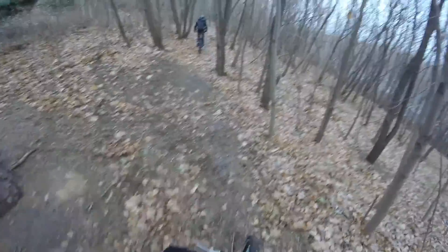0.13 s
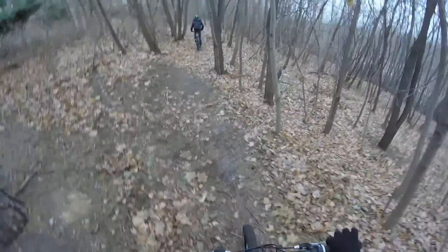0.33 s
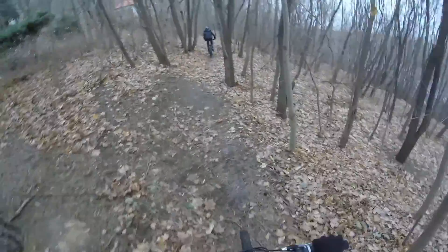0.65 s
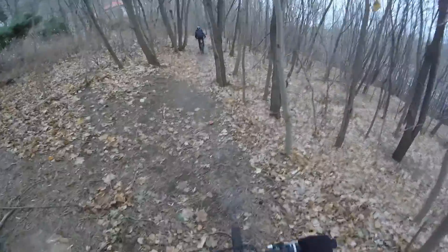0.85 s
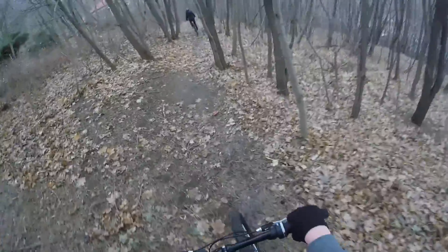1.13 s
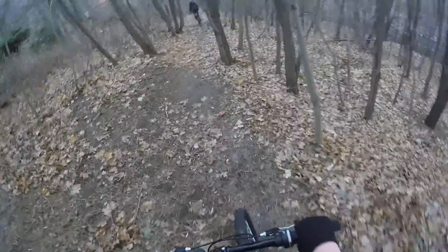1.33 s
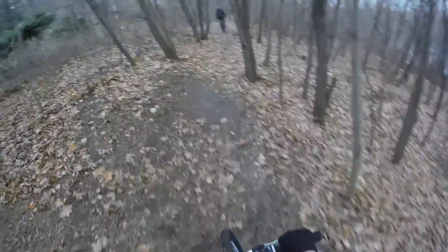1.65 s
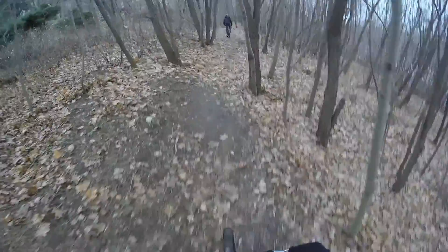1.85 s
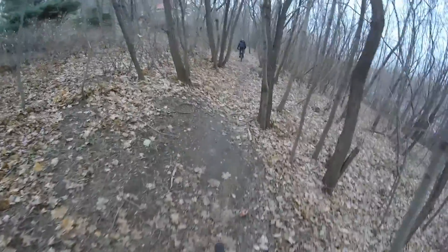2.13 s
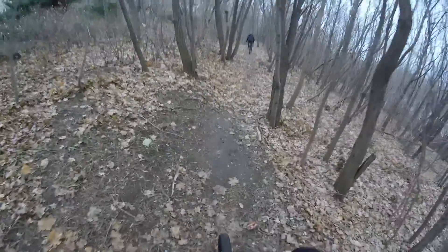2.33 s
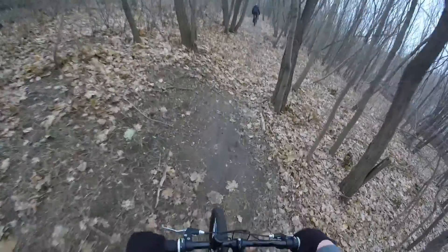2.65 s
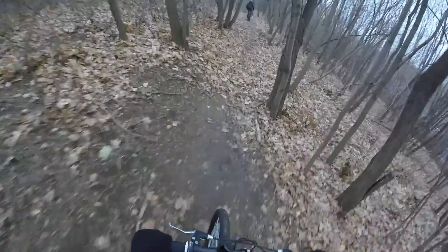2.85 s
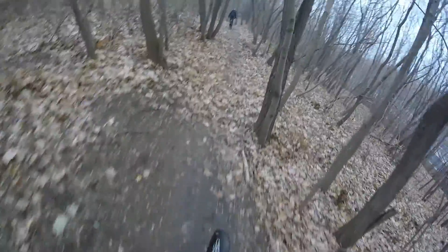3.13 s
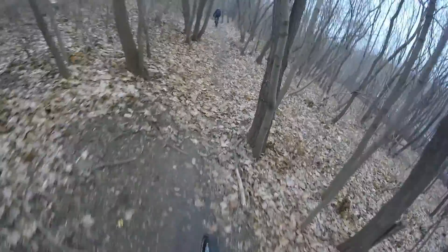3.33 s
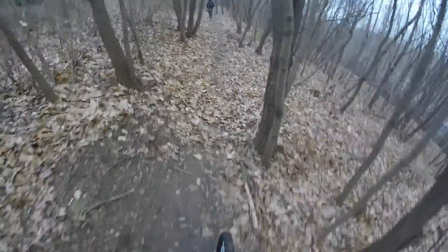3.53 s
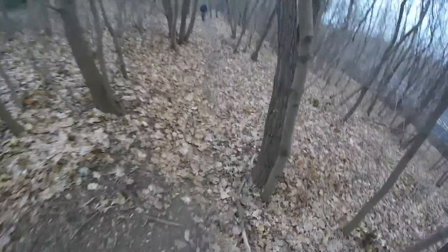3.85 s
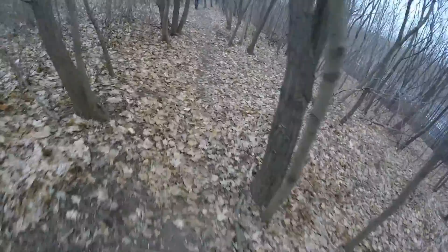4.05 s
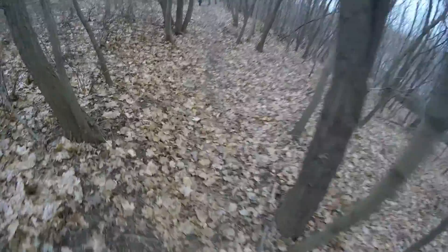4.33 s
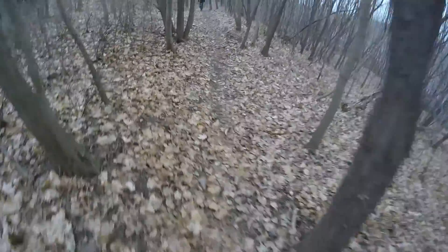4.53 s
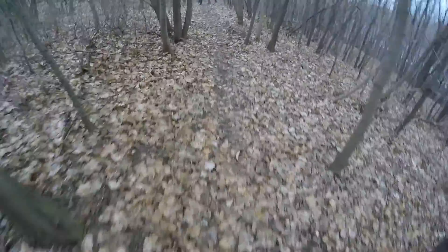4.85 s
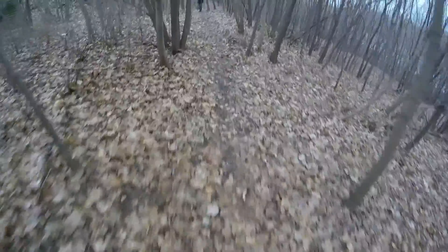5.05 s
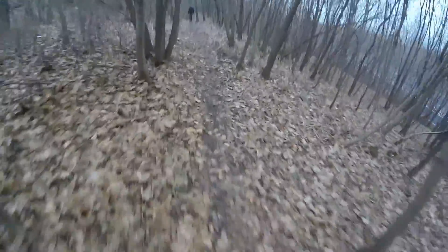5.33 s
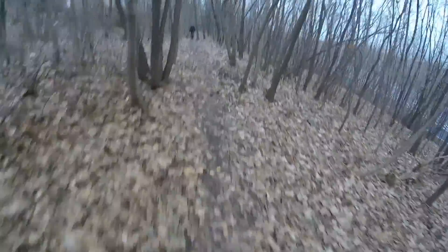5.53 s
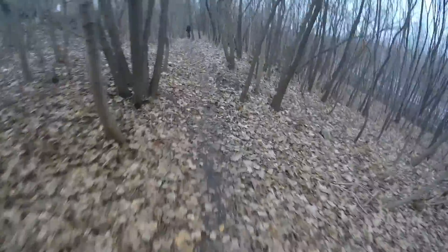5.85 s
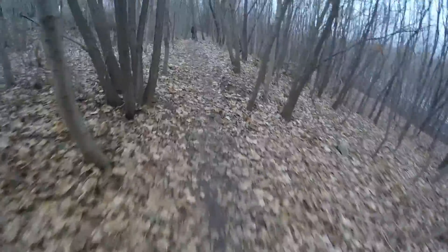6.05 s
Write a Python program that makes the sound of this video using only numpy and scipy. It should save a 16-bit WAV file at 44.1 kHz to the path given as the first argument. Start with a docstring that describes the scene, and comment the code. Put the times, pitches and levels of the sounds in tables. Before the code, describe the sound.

A bike rolls down a leafy forest trail: pulsing gritty crunch, low wind rumble, brief brake squeaks, and hard clacks early and late.

```python
"""Tyres crunch and drum in regular surges as a mountain bike rolls down packed dirt and dry leaves.
Crunch and leaf swish are dense random fractures, coloured by the hollow plastic case around the microphone.
The tread drum and the wind buffeting the case are low shaped noise, over a steady hiss.
A dragging brake squeals in short bursts: stacks of unsteady partials from pad and disc, with a noisy rasp.
Knocks are short chatter ringing through the case; thuds over roots are slow decaying swings."""
import sys
import numpy as np
from scipy import signal
from scipy.fft import rfft, irfft, next_fast_len
from scipy.io import wavfile
from scipy.ndimage import uniform_filter1d

SR = 44100
rng = np.random.default_rng(int(sys.argv[2]) if len(sys.argv) > 2 else 0)


def waveform_to_disk(signal):
    """Save audio, clipped to [-1, 1], as 16-bit WAV at the path in sys.argv[1]."""
    frames = np.transpose(np.atleast_2d(signal))
    scaled = np.clip(frames, -1, 1) * 32767
    samples = np.round(scaled).astype(np.int16)
    wavfile.write(sys.argv[1], SR, samples)


N = 272979
TIME = np.arange(N) / SR  # seconds

# Smooth spectra of the noises, each scaled to its level afterwards: pitch_hz [Hz], relative level_db [dB]
HISS_COLOUR = [(100, 2), (300, 3), (500, 0), (800, -3.5), (1500, -2.5), (3000, -11), (5000, -17),
               (8000, -22), (11000, -26), (15000, -40)]
WIND_COLOUR = [(4, -10), (11, 9.5), (22, -4.5), (40, -7.5), (60, -13), (120, -24.5), (400, -52.5),
               (2000, -88)]
KNOCK_COLOUR = [(200, -7), (700, -8), (1200, -6.5), (2000, -2.5), (3100, -2), (3900, -5.5), (4600, -13),
                (6100, -5.5), (9000, -19.5), (15000, -21)]
DRUM_COLOUR = [(30, -24), (60, -5), (80, 2.5), (105, -0.5), (175, 1), (240, -13), (400, -18), (900, -41),
               (3000, -62.5)]
LEAF_COLOUR = [(300, -41), (900, -2.5), (1600, -14), (2300, 10), (3000, 4.5), (3600, -2.5), (4500, -10.5),
               (6300, -9), (8000, -14.5), (11000, -22.5), (15000, -22)]
CRUNCH_COLOUR = [(200, -27), (600, -12), (950, -12.5), (1200, -4), (1500, 3.5), (2000, -5.5), (2700, -11.5),
                 (3400, -19), (4500, -23.5), (8000, -36.5), (15000, -34)]
# Resonances of the hollow case: pitch_hz [Hz], width_hz [Hz], lift_db [dB]
CASE = [(1164, 41, 9.5), (1636, 290, 12), (1947, 50, 7), (2199, 84, 9.5), (2595, 280, 13.5),
        (2970, 210, 5.5), (3996, 170, 7), (4900, 160, 3.5), (5570, 440, 4.5), (6280, 1000, 7),
        (7880, 110, 11), (9360, 300, 9.5), (10260, 640, 9), (13300, 300, 9), (13700, 370, 6.5)]

HISS_DB = -61.5
TOP_HZ = 15500

# Gusts on the case, over a steady breeze: centre_s [s], level_db [dB]
GUSTS = [(0.1, -49.5), (0.55, -48), (2.65, -51.5), (3.15, -48), (3.7, -43.5), (4.15, -50), (5.23, -42),
         (5.6, -52), (6.05, -50)]
BREEZE_DB, GUST_WIDTH_S = -54, 0.17

# Wheels thudding over roots: start_s [s], level_db [dB, before the trim], pitch_hz [Hz]
THUDS = [(0.606, -34, 120), (.62, -37, 76), (2.3, -38.5, 116), (2.369, -41, 80), (2.664, -40, 79.2),
         (3.05, -42, 82.6), (3.805, -42.5, 85), (4.178, -41.5, 90), (5.301, -40.5, 85), (5.66, -43, 84),
         (6.039, -36, 78.7)]
THUD_TRIM_DB = -8

# Knocks and ticks of the bike: start_s [s], level_db [dB], ring_hz [Hz], rise_s [s], treble_db [dB]
KNOCKS = [(0.4668, -30, 2800, 0.0012, 1), (0.4705, -44.5, 6960, 0.0012, 0), (1.169, -61, 2600, .002, 0),
          (1.409, -63, 7000, .001, 0), (2.039, -65, 8890, .0006, 0), (3.411, -64, 7536, .001, 0),
          (4.967, -48, 2507, 0.0018, 0), (5.0433, -43, 2190, 0.0016, -1), (5.0078, -26, 1750, 0.002, -4.5),
          (5.0123, -31.5, 2600, 0.002, -4.5)]

# Partials of the slipping pad, as multiples of the slip rate:
# multiple, level_db [dB relative to -45, at a pad level of -45 dB], growth [dB per dB of pad level]
PAD_PARTIALS = [(1, -12.5, 0.28), (3, 1, 1.5), (4, -11, 0.34), (6, -17.5, 0.5), (7, -30, 1), (8, -45, -0.5)]
# Partials of the ringing disc, as multiples of half its ringing note:
# multiple, level_db [dB relative to -45, at a ring level of -45 dB], growth [dB per dB of ring level]
DISC_PARTIALS = [(1, -21.5, 0.5), (2, 2.5, 1), (4, -32, 1.5), (5, -26, 1), (7, -33, 1), (8, -28.5, 1),
                 (10, -33, 0.5), (11, -32, 1)]
DISC_HZ = 2620  # the disc's own note
# Grabs of the brake pad: start_s [s], length_s [s], start slip rate start_hz [Hz],
# end slip rate end_hz [Hz], drive of the pad pad_db [dB], drive of the disc disc_db [dB]
GRABS = [(1.211, 0.026, 432.5, 442.3, -57.5, -45.5), (1.254, 0.016, 544.5, 526.5, -45.5, -49.5),
         (1.271, 0.043, 503, 510.4, -51, -45), (1.327, 0.041, 515.3, 525.5, -41.5, -39),
         (2.647, 0.021, 517.7, 521.3, -47.5, -43), (2.684, 0.047, 519.6, 524.3, -46, -37.5),
         (3.837, 0.005, 495, 496, -57.5, -68.5), (3.865, 0.0045, 491, 490, -54.5, -62),
         (3.891, 0.037, 504.3, 504.6, -50.5, -52.5), (3.948, 0.0293, 508.5, 551, -51.5, -53.5),
         (3.989, 0.017, 555, 556, -57, -70), (4.976, 0.012, 549.5, 562, -55, -60)]
GRAB_ATTACK_S, GRAB_RELEASE_S = 0.0093, 0.006
DISC_QUIT_S = 0.0099  # the disc starts to die away this long before the pad lets go
PAD_FLARE_DB = 3  # the pad flares up as the disc dies away
RUB_DB, RUB_S = -8, 0.035  # light rubbing around a grab, and its fade time
# The slip rate climbs into a grab and on out of it, up to a top rate
GLIDE_IN_HZ_PER_S, GLIDE_OUT_HZ_PER_S, GLIDE_OUT_MAX_HZ = 350, 2650, 568

# Surges in order, levels before the trims: drum_db [dB], opening_crunch_db [dB], following_crunch_db [dB]
SURGES = [(-56, -54.5, -55.5), (-55.5, -51.5, -63.5), (-57.5, -59, -59.5), (-58, -57.5, -70),
          (-58, -60, -68)]
FIRST_SURGE_S, SURGE_PERIOD_S = 0.67, 1.35
DRUM_ATTACK_S, DRUM_HOLD_S, DRUM_RELEASE_S = 0.027, 0.54, 0.1
DRUM_REST_DB, DRUM_TRIM_DB = -63.5, -1.15
CRUNCH_LAG_S, CRUNCH_ATTACK_S, CRUNCH_HOLD_S, CRUNCH_RELEASE_S = 0.05, 0.1, 0.06, 0.38
FOLLOW_LAG_S, FOLLOW_WIDTH_S = 1.0, 0.16
# Rolling crunch beneath the surges: time_s [s], level_db [dB, before the trim]
ROLLING = [(0, -56.5), (0.4, -57), (1.2, -60), (2.9, -64), (4.1, -65.5), (5.3, -60.5), (6.19, -65)]
CRUNCH_TRIM_DB, LEAF_TRIM_DB = 2.0, 1.46
# A thin cover of leaves that slowly gets thinner, level before the trim
COVER_DB, COVER_DB_PER_S = -64, -0.71
# Drifts of deep leaves: start_s [s], length_s [s], level_db [dB, before the trim]
DRIFTS = [(4.719, 0.088, -58), (4.901, 0.32, -55.5), (5.418, 0.045, -57.5), (5.915, 0.028, -63.5)]
DRIFT_ATTACK_S, DRIFT_RELEASE_S = 0.15, 0.13


def undb(db):
    """Decibels to gain."""
    return 10 ** (np.asarray(db) / 20)


def unit(x):
    """Scale to an rms of 1."""
    return x / np.sqrt(np.mean(x ** 2))


def add(out, s, sound):
    """Mix a sound in at time s."""
    i = int(s * SR)
    out[i:i + len(sound)] += sound[:N - i]


def walk(rate):
    """Random levels held 1 / rate s, smoothed twice and scaled to an rms of 1."""
    hold = max(int(SR / rate), 1)
    steps = np.repeat(rng.standard_normal(N // hold + 1), hold)
    return unit(uniform_filter1d(uniform_filter1d(steps, hold), hold)[:N])


def swell(start, attack, hold, release):
    """Gain that grows exponentially until the start time, holds and dies away."""
    before = np.maximum(start - TIME, 0)
    after = np.maximum(TIME - start - hold, 0)
    return np.exp(-before / attack - after / release)


def bump(centre, width):
    """Bell-shaped gain around a centre time."""
    return np.exp(-0.5 * ((TIME - centre) / width) ** 2)


def colour(x, spectrum, resonances=()):
    """Causal minimum-phase filter from a smooth spectrum with resonant humps on it."""
    size = next_fast_len(len(x) + 4096, True)
    f = np.maximum(np.fft.rfftfreq(size, 1 / SR), 1)
    hz, db = np.transpose(spectrum)
    gain_db = np.interp(np.log(f), np.log(hz), db)
    for centre, width, lift in resonances:
        gain_db = gain_db + lift / (1 + (2 * (f - centre) / width) ** 2)
    # folding the cepstrum forward in time makes the filter causal
    cepstrum = irfft(np.log(undb(gain_db)), size)
    cepstrum[1:size // 2] *= 2
    cepstrum[size // 2 + 1:] = 0
    return irfft(rfft(x, size) * np.exp(rfft(cepstrum)), size)[:len(x)]


def noise(spectrum, resonances=()):
    """Coloured steady noise with an rms of 1."""
    return unit(colour(rng.standard_normal(N), spectrum, resonances))


def hiss():
    """A smooth steady noise lies under everything."""
    return undb(HISS_DB) * noise(HISS_COLOUR)


def wind():
    """Gusts add their power to a steady breeze of low noise pushing on the case."""
    gusts = sum((undb(db) * bump(s, GUST_WIDTH_S)) ** 2 for s, db in GUSTS)
    return noise(WIND_COLOUR) * np.sqrt(undb(BREEZE_DB) ** 2 + gusts)


def thuds(rise_s=0.014):
    """Each root sets tyre and frame swinging for a few slow cycles."""
    out, t = np.zeros(N), TIME[:SR // 4]
    envelope = t / rise_s * np.exp(1 - t / rise_s)
    for s, db, hz in THUDS:
        add(out, s, undb(db) * envelope * np.sin(2 * np.pi * hz * t))
    return undb(THUD_TRIM_DB) * out


def knocks(rattle_db=-17, rattle_s=0.015, treble_hz=3500):
    """Hard parts chatter for milliseconds, rattle on briefly and ring the case; softer contacts lose treble."""
    out, t = np.zeros(N), TIME[:SR // 16]
    case = [(f, width, 0.7 * lift) for f, width, lift in CASE]
    for s, db, hz, rise, treble_db in KNOCKS:
        impact = (t / rise * np.exp(1 - t / rise)) ** 2
        rattle = undb(rattle_db) * np.exp(-t / rattle_s)
        chatter = rng.choice([-1., 1.], len(t)) * (impact + rattle)
        spectrum = [(f, gain_db + treble_db * (f > treble_hz)) for f, gain_db in KNOCK_COLOUR]
        ring = colour(chatter, spectrum, case + [(hz, 0.67 * hz, 12)])
        # the level is that of the whole energy packed into 3.3 ms
        add(out, s, undb(db) * ring / np.sqrt(np.sum(ring ** 2) / (0.0033 * SR)))
    return out


def grabs(ring_up_db=-13):
    """Slip rate, pad level and disc level; at every moment the strongest grab sets the pitch."""
    pads, discs, rates = [], [], []
    for s, length, start_hz, end_hz, pad_db, disc_db in GRABS:
        ringing = max(length - DISC_QUIT_S, 0)
        grip = swell(s, GRAB_ATTACK_S, length, GRAB_RELEASE_S)
        rub = undb(RUB_DB) * swell(s, RUB_S, length, RUB_S)
        flare = undb(PAD_FLARE_DB) * swell(s + ringing, GRAB_RELEASE_S, length - ringing, GRAB_RELEASE_S)
        pads.append(undb(pad_db) * np.max([grip, rub, flare], axis=0))
        ring = swell(s, GRAB_ATTACK_S, ringing, GRAB_RELEASE_S)
        ring_up = undb(ring_up_db) * swell(s, RUB_S, ringing, GRAB_ATTACK_S)
        discs.append(undb(disc_db) * np.maximum(ring, ring_up))
        glide_in = GLIDE_IN_HZ_PER_S * np.clip(s - TIME, 0, 3 * RUB_S)
        glide_out = GLIDE_OUT_HZ_PER_S * np.maximum(TIME - s - length, 0)
        slip_hz = np.interp(TIME, [s, s + length], [start_hz, end_hz])
        rates.append(np.minimum(slip_hz + glide_out - glide_in, GLIDE_OUT_MAX_HZ))
    strongest = np.argmax(np.hypot(pads, discs), axis=0)
    hz = np.array(rates)[strongest, np.arange(N)]
    pad_db, disc_db = (20 * np.log10(np.max(gains, axis=0) + 1e-12) for gains in (pads, discs))
    return uniform_filter1d(hz, int(0.0047 * SR)), pad_db, disc_db


def partials(hz, level_db, table, jitter, flutter_db):
    """Partials on one unsteady pitch, so the high ones are hoarse; each grows at its own rate with the drive."""
    phase = 2 * np.pi * np.cumsum(hz * (1 + jitter * walk(1500))) / SR
    drive_db = level_db + 45
    stack = np.zeros(N)
    for multiple, db, growth in table:
        tone = np.sin(round(multiple) * phase + rng.uniform(0, 2 * np.pi))
        stack += tone * undb(db + growth * drive_db + flutter_db * walk(300))
    return np.sqrt(2) * undb(-45) * stack


def brake(overtone_db=9, touch_db=-63):
    """The pad sticks and slips, the disc rings along and the rubbing rasps."""
    hz, pad_db, disc_db = grabs()
    # the brake fades out where the pad level falls below the touch level
    contact = uniform_filter1d(1 / (1 + undb(touch_db - pad_db) ** 2), int(0.016 * SR))
    # the disc locks on to the multiple of the slip rate nearest its own note, and also swings at half of that
    half_ring_hz = hz * np.round(DISC_HZ / hz) / 2
    pad = partials(hz, pad_db, PAD_PARTIALS, jitter=0.016, flutter_db=1.73)
    disc = partials(half_ring_hz, disc_db, DISC_PARTIALS, jitter=0.0076, flutter_db=1.8)
    # the rasp wakes the high overtones of the disc at their own fixed pitches
    overtones = [(round(k) * DISC_HZ / 2, 170, overtone_db) for k, _, _ in DISC_PARTIALS[2:]]
    rasp = noise(LEAF_COLOUR, CASE + overtones)
    rubbing = np.hypot(undb(pad_db), undb(disc_db)) ** 0.77
    return contact * (pad + disc + undb(-20) * rubbing * rasp)


def surges():
    """Gains of drum and crunch: each surge drums, opens with a crunch burst and is followed by another."""
    rolling_db = np.interp(TIME, *np.transpose(ROLLING))
    drum_power, crunch_power = undb(DRUM_REST_DB) ** 2, undb(rolling_db) ** 2
    for k, (drum_db, opening_db, following_db) in enumerate(SURGES):
        s = FIRST_SURGE_S + k * SURGE_PERIOD_S
        drum = undb(drum_db) * swell(s, DRUM_ATTACK_S, DRUM_HOLD_S, DRUM_RELEASE_S)
        burst = swell(s + CRUNCH_LAG_S, CRUNCH_ATTACK_S, CRUNCH_HOLD_S, CRUNCH_RELEASE_S)
        opening = undb(opening_db) * burst
        following = undb(following_db) * bump(s + FOLLOW_LAG_S, FOLLOW_WIDTH_S)
        drum_power = drum_power + drum ** 2
        crunch_power = crunch_power + opening ** 2 + following ** 2
    return np.sqrt(drum_power), np.sqrt(crunch_power)


def tread_drum(drumming):
    """The tread drums on hard ground: low noise that follows the surges."""
    return noise(DRUM_COLOUR) * drumming * undb(DRUM_TRIM_DB)


def crackle(rate, spread_db):
    """Dense tiny fractures of very unequal size, rate per second on average."""
    hit = rng.random(N) < rate / SR
    size_db = spread_db * np.minimum(rng.exponential(size=N), 5)
    return unit(hit * rng.choice([-1, 1], N) * undb(size_db))


def tyres(crunch):
    """Knobs crush grit and leaves in uneven clumps; deeper leaves add a brighter swish."""
    drift_power = sum((undb(db) * swell(s, DRIFT_ATTACK_S, length, DRIFT_RELEASE_S)) ** 2
                      for s, length, db in DRIFTS)
    leaves = np.hypot(undb(COVER_DB + COVER_DB_PER_S * TIME), np.sqrt(drift_power))
    grit_clumps = crackle(rate=5000, spread_db=2.0) * undb(0.77 * walk(60))
    leaf_clumps = crackle(rate=7000, spread_db=4.0) * undb(1.6 * walk(45))
    grit = unit(colour(grit_clumps, CRUNCH_COLOUR, CASE))
    swish = unit(colour(leaf_clumps, LEAF_COLOUR, CASE))
    return grit * crunch * undb(CRUNCH_TRIM_DB) + swish * leaves * undb(LEAF_TRIM_DB)


def scene():
    """Everything reaches one microphone inside the case."""
    drumming, crunch = surges()
    background = hiss() + wind()
    bike = thuds() + knocks() + brake()
    return (background + bike + tread_drum(drumming) + tyres(crunch))[None]


def record(dry):
    """A steep low-pass cuts the top."""
    return signal.sosfilt(signal.ellip(8, .2, 70, TOP_HZ, fs=SR, output="sos"), dry)


dry = scene()
out = record(dry)
waveform_to_disk(out)
```